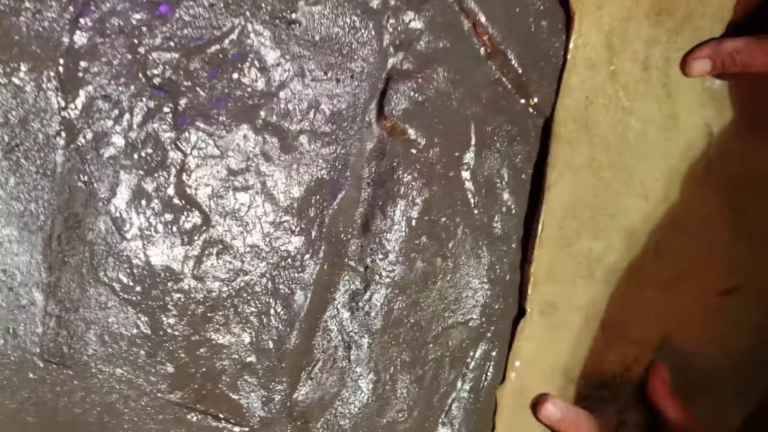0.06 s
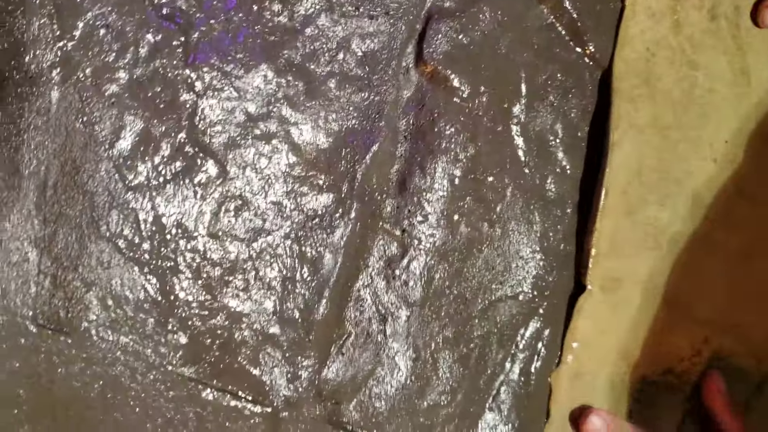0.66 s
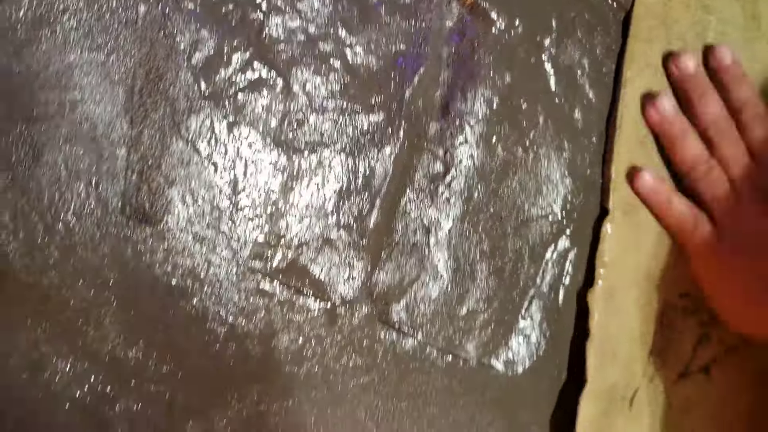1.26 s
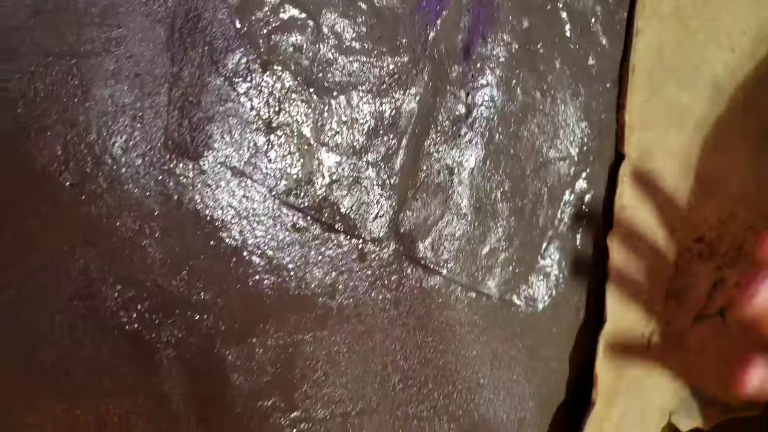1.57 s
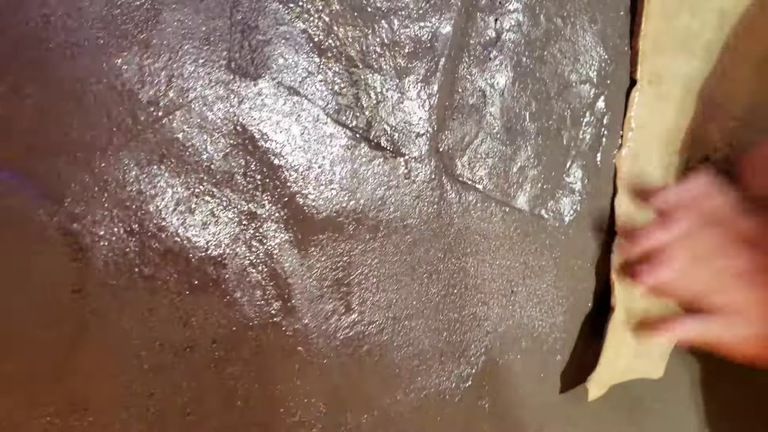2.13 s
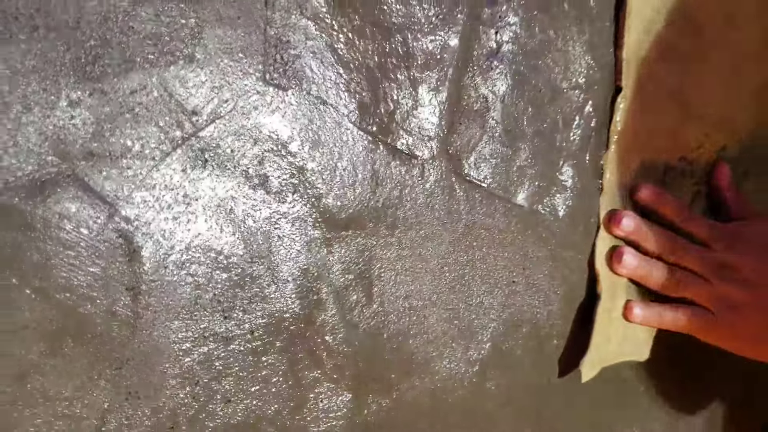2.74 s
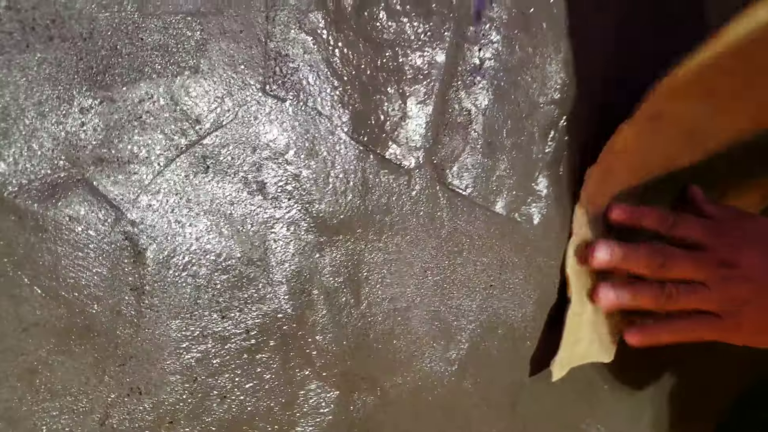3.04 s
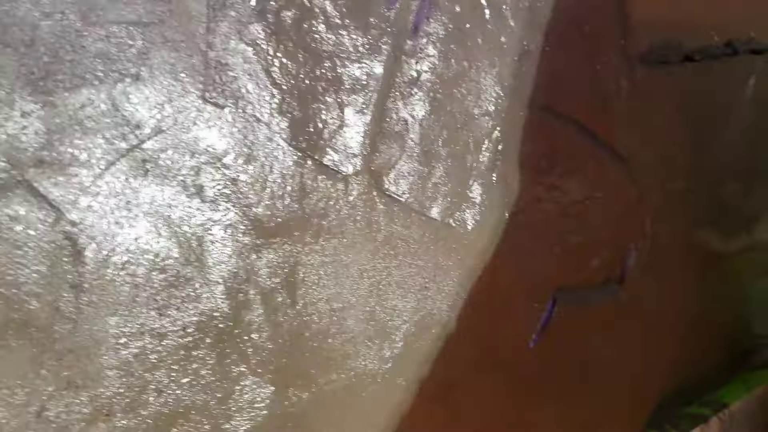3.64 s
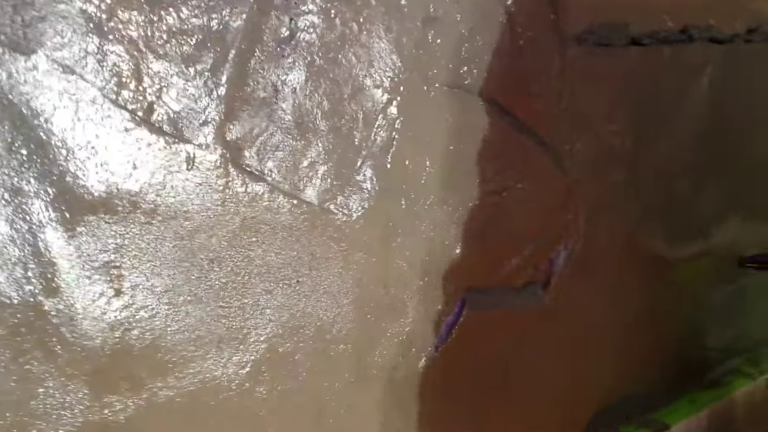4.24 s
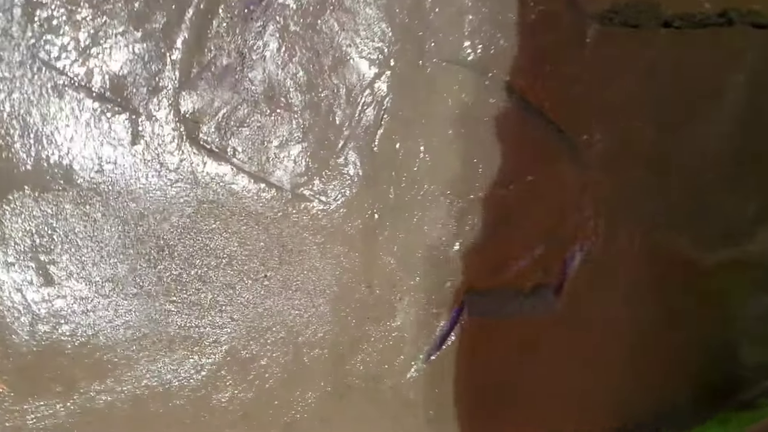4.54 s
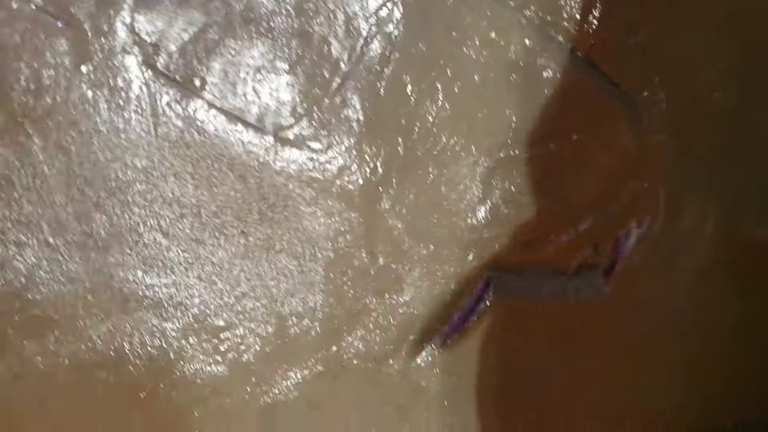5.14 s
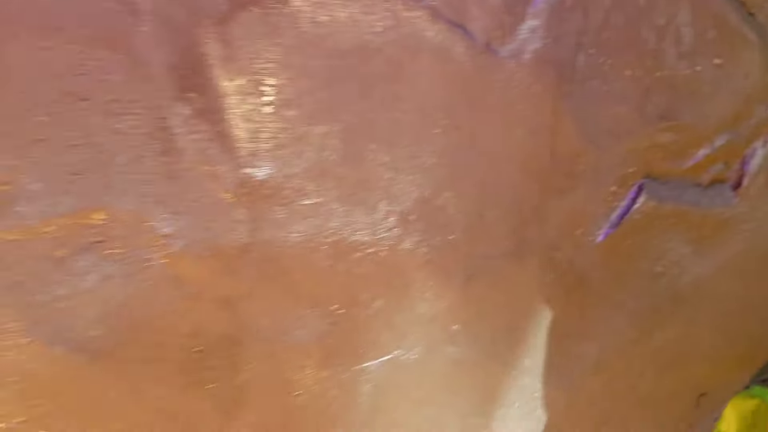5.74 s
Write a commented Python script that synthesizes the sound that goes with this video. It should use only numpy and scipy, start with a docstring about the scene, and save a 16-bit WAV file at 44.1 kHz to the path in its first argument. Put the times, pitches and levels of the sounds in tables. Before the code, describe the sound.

In a bare, echoing room, hands slap a rubber mat into wet cement on a wall, about four times a second, each sharp crack backed by a low thump. Three duller knocks fall among the later slaps and make the wall ring. The slapping stops halfway through, leaving soft sleeve rustles and faint rubbing as the mat is peeled off. One light touch comes near the end. The microphone is close.

```python
"""In a bare room with a faint hum, hands pat a rubber stamp mat into wet cement on a wall, near a phone.
Each slap squeezes air out, cracks, pops under the palm and thumps the wall; sleeves brush past.
Around 2 s, three duller knocks among the slaps make the wall ring. From about 3 s the mat is
peeled off and carried away, rubbing in the hand, and a thin whistle pulses far off.
The sleeves keep rustling, and one last light touch lands at 5.6 s."""
import sys
import numpy as np
from scipy import signal
from scipy.fft import rfft, irfft
from scipy.io import wavfile
from scipy.ndimage import uniform_filter1d

SR = 44100
rng = np.random.default_rng(int(sys.argv[2]) if len(sys.argv) > 2 else 0)


def to_wav(sig):
    """Store sig (one row per channel, or 1-D mono) as 16-bit WAV at the path in sys.argv[1].

    Samples outside -1..1 are clipped; the rate is SR.
    """
    pcm = np.clip(np.atleast_2d(sig), -1, 1) * 32767
    pcm = np.round(pcm).astype(np.int16)
    wavfile.write(sys.argv[1], SR, pcm.T)  # frames by channels


N = 264587
T = np.arange(N) / SR
HZ = np.maximum(np.arange(N // 2 + 1) * SR / N, 1)


# Levels in all tables are relative; fade_s is the time a ring takes to drop by 60 dB.
# slaps of palm and fingers: start_s, crack_db, closing_ms, pop_hz, pop_db, pop_fade_cycles, thump_db
HAND_SLAPS = [ (0.021, -25.5, 4.9, 1310, -48, 4.2, -33), (.032, -16, 0.78, 2920, -9.5, 3.2, -44.5),
              (.036, -23.5, 6.6, 927, -18, 3.7, -34), (.106, -27.5, 1.3, 530, -27, 1.6, -41.5),
              (0.111, -31, 1, 876, -27.5, 4.6, -51), (.172, -24.5, 2.4, 880, -29.5, 3, -52),
              (0.408, -30.5, 5.6, 1080, -53, 1.6, -34.5), (0.42, -20, 0.9, 1000, -48, 2.7, -42),
              (.658, -36.5, 5, 1000, -17, 3.1, -63), (.668, -18, 4.3, 890, -14.5, 5.2, -33),
              (0.904, -17.5, 4.2, 809, -26, 14.3, -26.5), (1.1319, -9.5, 1.2, 1130, -23.5, 3, -25.5),
              (1.3635, -5.5, 2.3, 1450, -11.5, 1.4, -24), (1.807, -22, 1.7, 2130, -23, 4.9, -29.5),
              (1.812, -14, 1.6, 1030, -15.5, 0.45, -32), (2.057, -13, 1.4, 1095, -17, 2.9, -25),
              (2.3016, -10.5, 1.2, 1440, -4.5, 0.25, -21), (2.530, -19.5, 2, 1240, -16.5, 0.62, -23),
              (5.611, -41, .8, 670, -65, 1.6, -40.5)]
# tone of the skin's crack: pitch_hz, level_db
CRACK_TONE = [(150, -1.5), (310, -8), (450, -4), (1000, 1), (2000, -3.5), (3500, -0.5), (5500, -4),
              (8000, -11.5), (12000, -11.5), (16000, 1.5)]
# the rubber mat's short, high rings: pitch_hz, level_db, fade_s
MAT_RINGS = [(1637, -14, 0.024), (3300, -20.5, 0.11), (4180, -6.5, 0.04)]

def slaps(snap_ms=1.4, splash_ms=5.7, scatter_ms=3.6, firm_db=-12):
    """Air hisses out as the hand closes, the skin cracks, the trapped air pops and the wall thumps."""
    near, thumps, echoes = np.zeros(N), np.zeros(N), np.zeros((2, N))
    lead = 1024  # samples before the hand lands
    t = (np.arange(32 * lead) - lead) / SR
    after, gap_ms = np.maximum(t, 0), np.abs(1000 * t)
    for start_s, crack_db, closing_ms, pop_hz, pop_db, pop_cycles, thump_db in HAND_SLAPS:
        # softer slaps are duller and have more echo, up to a limit
        softer_db = min(firm_db - crack_db, 14.5)
        tilt_db = -2.08 - 0.1883 * softer_db
        room_db = -7.5 + 0.0774 * softer_db
        snap = np.exp(-gap_ms / np.where(t < 0, closing_ms, snap_ms))
        splash = gain(-14) * (t > 0) * np.exp(-gap_ms / splash_ms)
        contact = (snap + splash) * rng.standard_normal(len(t))
        contact[lead] += 1.3  # the instant the gap seals
        skin = gain(-2.5) * colour(contact, CRACK_TONE, tilt_db)
        crack = gain(crack_db) * (skin + ringing(MAT_RINGS, after))
        # hand, arm and wall scatter part of the crack, so each microphone hears it differently
        scatter = np.exp(-gap_ms / np.where(t < 0, closing_ms, scatter_ms)) * all_round_noise(len(t))
        add(echoes, start_s + t[0], gain(crack_db - 5) * colour(scatter, CRACK_TONE, tilt_db))
        # a cupped palm rings for more cycles than a flat one
        pop = gain(pop_db + 2) * np.sin(2 * np.pi * pop_hz * after) * np.exp(-after * pop_hz / pop_cycles)
        thump = gain(thump_db + 6) * thump_and_boom(after)
        # the room hears the crack from all directions, so its tone there is smooth
        click = gain(crack_db) * np.linalg.norm(contact) * colour(1. * (t == 0), CRACK_TONE, tilt_db)
        into_room = gain(room_db) * (click + gain(-4) * pop) + gain(-9) * thump
        add(near, start_s + t[0], crack + pop)
        add(thumps, start_s + t[0], thump)
        add(echoes, start_s + t[0], room(into_room))
    return near, thumps, echoes


# knocks with the heel of the hand: start_s, level_db, brightness_db_per_octave, thump_db
HEEL_KNOCKS = [(1.658, -24.5, 3.5, -22.5), (1.9277, -32, 2.5, -28), (2.1639, -39.5, -0.5, -32)]
# tone of a knock's clatter: pitch_hz, level_db
KNOCK_TONE = [(150, -1), (500, 17.5), (1000, 10), (2700, 7), (5000, -7.5), (9000, -19.5), (16000, -24.5)]
# the wall's higher rings, woken by knocks: pitch_hz, level_db, fade_s
WALL_RINGS = [(222.6, 8.5, 0.75), (377, 5, 0.55), (488, -9, 1), (693, -16, 0.41), (940, -33, 0.16),
              (1350, -26, 0.13), (1440, -21, 0.17), (2260, 16.5, 0.059), (2900, -29, 0.1)]

def knocks(clatter_s=0.033, landing_s=0.0021):
    """The heel of the hand lands on one spot, so each knock has the same clatter and ring."""
    near, thumps, echoes = np.zeros(N), np.zeros(N), np.zeros((2, N))
    t = np.arange(2 ** 15) / SR
    landing = 1 - np.exp(-t / landing_s)  # soft flesh takes a moment to land
    clatter = rng.standard_normal(len(t)) * np.exp(-t / clatter_s) * landing
    ring = gain(-15) * ringing(WALL_RINGS, t)
    thump = thump_and_boom(t)
    echo = room(np.linalg.norm(clatter) * (t == 0)) * landing
    for start_s, level_db, tilt_db, thump_db in HEEL_KNOCKS:
        add(near, start_s, gain(level_db) * (colour(clatter, KNOCK_TONE, tilt_db) + ring))
        add(thumps, start_s, gain(thump_db + 8) * thump)
        add(echoes, start_s, gain(level_db + 2) * colour(echo, KNOCK_TONE, tilt_db))
    return near, thumps, echoes


# the low thump of the wall and the boom of the room after it: pitch_hz, level_db, fade_s, rise_s
THUMP_AND_BOOM_NOTES = [(45.14, -32, 0.56, .03), (71.5, -8, 0.21, 0.025), (83.3, -24.5, 1.26, 0.04),
                        (120.7, -3.5, 0.15, 0.013), (136.7, 0.5, 0.16, 0.0097), (163.3, -10, 0.32, 0.0088),
                        (227, -8, 0.092, 0.0067)]

def thump_and_boom(t, detune=.035):
    """The wall thumps and the room booms after it; each spot is tuned a little differently."""
    thump = 0
    for pitch_hz, level_db, fade_s, rise_s in THUMP_AND_BOOM_NOTES:
        spot_hz = pitch_hz * (1 + detune * rng.standard_normal())
        loudness = gain(level_db - 60 * t / fade_s) * (1 - np.exp(-t / rise_s))
        thump -= loudness * np.sin(2 * np.pi * spot_hz * t)
    return thump


# strokes of the sleeve: peak_s, rise_s, fall_s, rub_db, extra_hiss_db
SLEEVE_STROKES = [ (.3, 0.16, .1, -54, 6), (0.538, 0.15, 0.13, -42.5, 3), (2.4, 0.16, 0.14, -55.5, 2.5),
                  (2.6, 0.14, 0.086, -52.5, 4), (3.22, .035, 0.021, -53, 2), (3.59, 0.11, 0.029, -60.5, -1),
                  (3.78, 0.06, 0.052, -46, 2), (4.25, 0.027, 0.023, -51.5, 2),
                  (4.37, 0.034, 0.024, -58.5, -4), (4.755, 0.021, 0.0088, -68, 13),
                  (4.985, 0.071, 0.099, -55.5, 7), (5.19, 0.089, 0.13, -46, 14.5),
                  (5.31, 0.084, 0.13, -44.5, 4), (5.38, 0.014, 0.012, -44.5, 19.5),
                  (5.701, 0.2, 0.12, -62.5, 8), (5.958, 0.027, 0.027, -53.5, 0)]
# light rustle as the arm swings, then as it carries the mat: start_s, end_s, rub_db, extra_hiss_db
SLEEVE_RUSTLES = [(0, 1.68, -60.5, 0.5), (3.65, 6.8, -69, 6)]
# tone of rubbing cloth: pitch_hz, level_db
CLOTH_TONE = [(300, -18.5), (1200, -4.5), (2200, 0.5), (3100, 2), (4000, 5.5), (6200, -0.5), (8000, -5.5),
              (12000, -7), (16000, 2.5)]

def sleeve(split_hz=7000):
    """Cloth brushes close by with a lower rub and a fine hiss; each stroke has its own share of hiss."""
    cloth = friction(CLOTH_TONE, grain_db=4.5)
    rub = irfft(rfft(cloth) / (1 + (HZ / split_hz) ** 8), N)
    hiss = cloth - rub
    moves = [(gain(db) * swell(peak, rise, fall), extra) for peak, rise, fall, db, extra in SLEEVE_STROKES]
    moves += [(gain(db) * hold(start, end), extra) for start, end, db, extra in SLEEVE_RUSTLES]
    rub_level = together([level for level, _ in moves])
    hiss_level = together([level * gain(extra) for level, extra in moves])
    return rub_level * rub + hiss_level * hiss


# the mat bending as it comes off: peak_s, rise_s, fall_s, level_db
MAT_BENDS = [(3.16, 0.044, .09, -70.5), (3.59, 0.0049, 0.0039, -49), (3.66, 0.14, 0.21, -64),
             (5.1, 0.24, .35, -63.5)]
# tone of peeling rubber: pitch_hz, level_db
PEEL_TONE = [(150, -1), (400, 1), (900, 1.5), (1600, -1), (4000, -4), (16000, -48)]

def peeling(carry_from_s=3.55):
    """The mat bends off the cement, lets go with a small snap and keeps rubbing in the hand."""
    bends = [gain(db) * swell(peak, rise, fall) for peak, rise, fall, db in MAT_BENDS]
    carrying = gain(-69) * hold(carry_from_s, T[-1])
    return together(bends + [carrying]) * friction(PEEL_TONE, grain_db=2)


# the room's echo, band by band: pitch_hz, level_db, fade_s
ECHO_BANDS = [(60.5, 8, 0.83), (139.3, -10.5, 0.89), (398, 7, 0.54), (1000, 3, 0.45), (3050, -1.5, 0.48),
              (5900, 1, 0.35), (12680, 0.5, 0.25)]

def room(sound, onset_s=0.00047, early_s=0.013, size=24576):
    """Bare walls give early echoes, then a tail longest in the bass; each spot has its own pattern."""
    t, hz = np.arange(size) / SR, pitches(size)
    noise, echo = rfft(all_round_noise(size)), 0
    for band_hz, level_db, fade_s in ECHO_BANDS:
        band = curve([(row[0], row[0] == band_hz) for row in ECHO_BANDS], hz)
        echo += irfft(noise * band, size) * gain(level_db - 60 * t / fade_s)
    echo *= 1 - np.exp(-(t / onset_s) ** 2)
    echo *= 1 + gain(3) * np.exp(-t / early_s)
    return gain(-33.5) * signal.fftconvolve(sound[None], echo, axes=1)[:, :len(sound)]


# tone of the still air: pitch_hz, level_db
AIR_TONE = [(15, -64), (25, -18), (114, -3), (217, -15), (373, -22), (503, -21.5), (1100, -25),
            (2160, -23.5), (4490, -23.5), (6560, -28), (8590, -40.5), (11300, -24.5), (16000, -31)]
# the mains hum, then the whistle: pitch_hz, level_db
HUM_AND_WHISTLE = [(118.4, -59), (2213, -69.5)]

def background(air_db=-56.5, waver_db=2, pulse_hz=5.9, pulse_peak_s=3.7, whistle_from_s=3.1):
    """Still air with a wavering mains hum and a thin whistle that pulses like a far cricket."""
    sound = gain(air_db) * normalise(irfft(rfft(all_round_noise(N)) * gain(curve(AIR_TONE, HZ)), N))
    pulses = np.abs(np.cos(np.pi * pulse_hz * (T - pulse_peak_s))) ** 2.5
    whistle_level = gain(3) * hold(whistle_from_s, T[-1]) * pulses
    turns_s = np.linspace(0, T[-1], 60)
    for (hz, db), strength in zip(HUM_AND_WHISTLE, (1, whistle_level)):
        waver, drift = (np.interp(T, turns_s, rng.standard_normal(len(turns_s))) for _ in range(2))
        sound += strength * gain(db + waver_db * waver) * np.sin(2 * np.pi * hz * T + 0.89 * drift)
    return sound


def ringing(notes, t):
    """The notes of a struck object fade from t = 0, each swinging up or down first by chance."""
    return sum(gain(db - 60 * t / fade_s) * np.sin(2 * np.pi * hz * t) * rng.choice([-1, 1])
               for hz, db, fade_s in notes)


def friction(tone, grain_db, grain_samples=48):
    """Countless tiny slips, their strength changing about every millisecond."""
    roughness = uniform_filter1d(rng.standard_normal(N), grain_samples) * np.sqrt(grain_samples)
    return normalise(colour(gain(grain_db * roughness) * rng.standard_normal(N), tone))


def all_round_noise(size, microphone_gap_s=0.00047):
    """Noise from all sides: alike in both microphones only in the bass."""
    hz = np.arange(size // 2 + 1) * SR / size
    alike = .98 * np.sinc(2 * hz * microphone_gap_s)
    mid, side = rfft(rng.standard_normal((2, size))) * np.sqrt([(1 + alike) / 2, (1 - alike) / 2])
    return irfft([mid + side, mid - side], size)


def swell(peak_s, rise_s, fall_s, shape=1.57):
    """One movement grows and dies away; shape 1 is a pointed peak, 2 a bell."""
    return np.exp(-(np.abs(T - peak_s) / np.where(T < peak_s, rise_s, fall_s)) ** shape)


def hold(start_s, end_s, ease_s=.1):
    """A steady movement that eases in and out."""
    return np.clip(np.minimum(T - start_s, end_s - T) / ease_s + 1, 0, 1)


def together(levels):
    """Unrelated movements add in power."""
    return np.linalg.norm(levels, axis=0)


def colour(sound, tone, tilt_db=0):
    """Give a sound a tone, then brighten or dull it by tilt_db per octave around 3.5 kHz."""
    size = sound.shape[-1]
    hz = pitches(size)
    tilt = gain(tilt_db * np.log2(np.maximum(hz, 1500) / 3500))
    response = normalise(gain(curve(tone, hz))) * tilt
    # fold the filter forward in time, so nothing rings before the sound arrives
    folded = irfft(np.log(response), size)
    folded[1:size // 2] *= 2
    folded[size // 2 + 1:] = 0
    return irfft(rfft(sound) * np.exp(rfft(folded)), size)


def curve(points, hz):
    """Read between a table's rows, with octaves evenly spaced."""
    table = np.array(points, float)
    return np.interp(np.log(hz), np.log(table[:, 0]), table[:, 1])


def pitches(size):
    """The frequencies in a sound of this many samples."""
    return np.maximum(np.arange(size // 2 + 1) * SR / size, 1)


def gain(db):
    """Turn decibels into a multiplier."""
    return 10 ** (np.asarray(db) / 20)


def normalise(x):
    """Scale to an average power of 1."""
    return x / np.sqrt(np.mean(x ** 2))


def add(track, start_s, sound):
    """Mix a sound in from start_s."""
    start = int(round(start_s * SR))
    sound = sound[..., max(-start, 0):N - start]
    start = max(start, 0)
    track[..., start:start + sound.shape[-1]] += sound


def microphones(sound, lag_ms, pan_db, duct_ms=0.042, duct_hz=7500):
    """A near sound reaches the left microphone later and louder; its duct adds delay below duct_hz."""
    delay_ms = lag_ms + duct_ms / (1 + (HZ / duct_hz) ** 6)
    late = irfft(rfft(sound) * np.exp(-2j * np.pi * HZ * delay_ms / 1000), N)
    return np.array([late * gain(pan_db / 2), sound * gain(-pan_db / 2)])


# the phone's microphone holes cut a dip in the treble and ring above it: pitch_hz, level_db
PHONE_TONE = [(1000, 0), (5500, 5.5), (7000, -1.5), (8300, -10), (9700, 0.5), (11300, 11.5), (12700, 11),
              (14000, 0.5), (16000, -8.5)]

def scene():
    """Hands in front, the sleeve to one side; sleeve and peeling are heard largely off the walls."""
    slap, slap_thumps, slap_echoes = slaps()
    knock, knock_thumps, knock_echoes = knocks()
    cloth, mat = sleeve(), peeling()
    near = microphones(slap, lag_ms=.085, pan_db=2.5)
    near += microphones(knock, lag_ms=.12, pan_db=.5)
    near += microphones(slap_thumps + knock_thumps, lag_ms=.18, pan_db=1.1)
    near += microphones(gain(-5) * cloth, lag_ms=.25, pan_db=5)
    far = slap_echoes + knock_echoes + room(gain(1.5) * cloth + gain(1) * mat)
    return irfft(rfft(near + far) * gain(curve(PHONE_TONE, HZ)), N) + background()


def record(dry):
    """The phone clips at full scale and cuts the treble above 15.9 kHz."""
    treble_cut = signal.ellip(12, .2, 90, 15900, fs=SR, output="sos")
    return signal.sosfilt(treble_cut, np.clip(dry, -1, 1))


dry = scene()
out = record(dry)
to_wav(out)
```